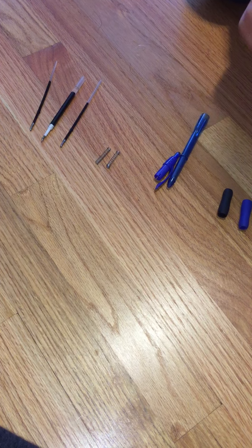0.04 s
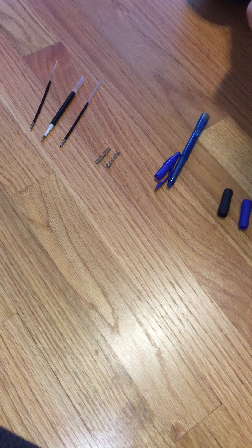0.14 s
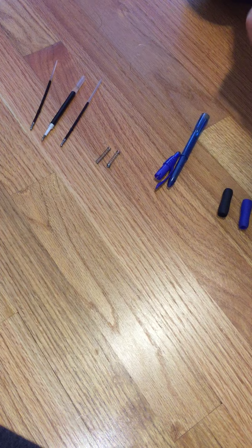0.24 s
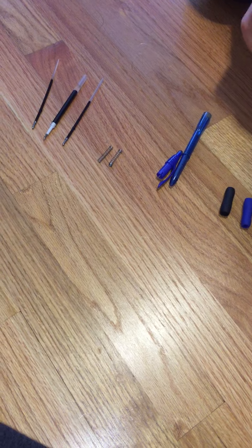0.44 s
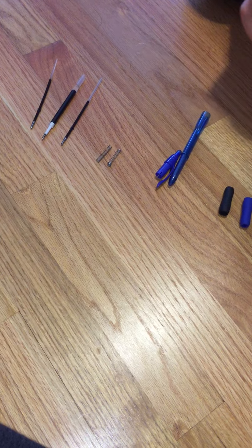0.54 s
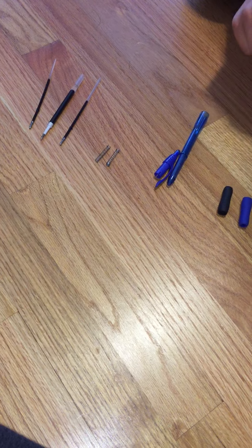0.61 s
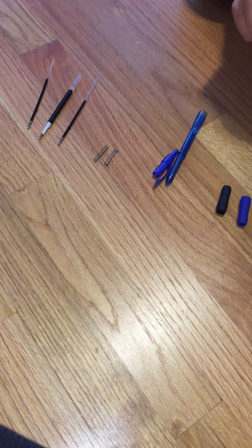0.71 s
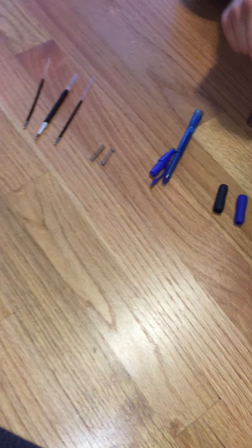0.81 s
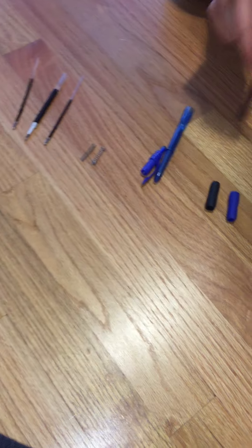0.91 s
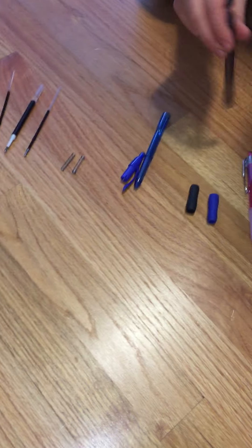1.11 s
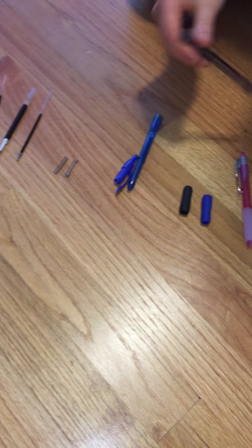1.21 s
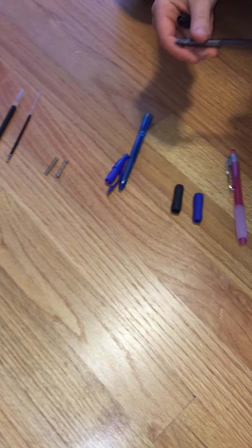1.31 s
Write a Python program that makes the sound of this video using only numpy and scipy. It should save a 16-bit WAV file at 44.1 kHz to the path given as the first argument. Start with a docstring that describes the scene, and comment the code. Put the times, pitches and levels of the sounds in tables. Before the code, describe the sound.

A retractable pen clicks against wood six times, evenly, from about 0.2 to 1.1 seconds. The first click is soft and the last is loudest, each a sharp plastic snap with a light wooden knock and a slight spring rattle. Loose pen parts tick faintly between the clicks and again around 1.3 seconds. The room is small and quiet, with a short echo.

```python
"""A small, quiet room: a retractable pen is clicked six times against wood, a little harder each time.
Each click layers a plastic snap, a shiver of the spring, a short ring of the barrel, a knock of the
wood and a low thud. The latch scrapes before the first click, the hand bumps softly, and loose parts
tick faintly between the clicks and as the pen is lifted. A short reverb and faint room tone sit behind."""
import sys
import numpy as np
from scipy import signal
from scipy.fft import rfft, irfft
from scipy.io import wavfile
from scipy.ndimage import uniform_filter1d

SR = 44100
rng = np.random.default_rng(int(sys.argv[2]) if len(sys.argv) > 2 else 0)


def wav_record(signal):
    """Record a signal, one row per channel, as 16-bit PCM in the file named by sys.argv[1]."""
    frames = np.transpose(np.atleast_2d(signal))
    bounded = np.clip(frames, -1, 1)
    # unit amplitude maps onto the largest positive 16-bit level
    quanta = np.round(bounded * 32767).astype(np.int16)
    wavfile.write(sys.argv[1], SR, quanta)


N = 59535

# bright plastic colour of snap and spring: (frequency [Hz], gain [dB])
SNAP_EQ = [(400, -30), (1500, -10.5), (3200, 3), (4200, 0), (4800, -5.5), (5600, 3), (6500, -4), (8000, -2),
           (9700, -1.5), (11000, -6), (12200, -2), (13700, -3.5), (16000, -16)]
# colour of the ticks and the latch scrape: (frequency [Hz], gain [dB])
TICK_EQ = [(600, -30), (1500, -23), (2400, 6), (3000, 9), (4000, 12.5), (5000, 4.5), (6500, 6), (9300, 6.5),
           (12000, -1), (16000, -8)]
SNAP_RISE_S, KNOCK_RISE_S = 0.00011, 0.00062


def pen_clicks():
    """Six clicks, each stacked from wood, plastic, barrel and thud; returns (direct, reverb send)."""
    # (time [s], knock [dB], contact cut-off [Hz], snap [dB], barrel pitch [Hz], barrel [dB],
    #  upper barrel pitch [Hz], upper barrel [dB], thud [dB], snap reverb send [dB])
    clicks = [(0.2073, -29.5, 2300, -39.5, 1310, -29.5, 2310, -29.5, -50, -10),
              (0.3869, -22, 2380, -27.5, 1184, -22.5, 2680, -28, -53, -1),
              (0.5642, -20.5, 2540, -21, 1440, -23, 2280, -21.5, -46.5, -2),
              (0.7373, -20.5, 2800, -20.5, 1528, -21, 2580, -29, -54, -0.5),
              (0.9089, -18.5, 2880, -17, 1605, -18, 2350, -36, -42.5, 0),
              (1.0727, -17, 3600, -15.5, 1162, -20, 2850, -14.5, -38.5, 2)]
    barrel_send_db = -3.5  # the barrel's ring carries less far than the knock
    t = np.arange(SR // 3) / SR
    direct, send = np.zeros((2, N))
    for start, knock_db, contact_hz, snap_db, *barrel_modes, thud_db, snap_send_db in clicks:
        wood = amp(knock_db) * (wood_knock(t, contact_hz) + board_flex(t))
        snap = plastic_snap(t, t60=0.011, rise=SNAP_RISE_S, eq=SNAP_EQ)
        plastic = amp(snap_db) * (snap + spring_rattle(t))
        barrel = barrel_ring(t, *barrel_modes)
        thud = amp(thud_db) * ring(t, hz=66, t60=0.13, rise=0.017)
        add(direct, start, wood + plastic + barrel + thud)
        add(send, start, wood + amp(snap_send_db) * plastic + amp(barrel_send_db) * barrel)
    return direct, send


def wood_knock(t, contact_hz):
    """The pen strikes the wood: a harder contact reaches higher modes, and low modes arrive later."""
    # modes of the wood: (frequency [Hz], level [dB], t60 [s])
    modes = [(542, -3.5, 0.009), (681.3, -3, 0.025), (830, -17.5, 0.1), (944, -7, .037), (998, -24, 0.054),
             (1050, -22.5, 0.054), (1369, 0, 0.011), (1617.7, 3, 0.015), (1803.5, 13.5, 0.0064),
             (2246, 12.5, 0.0071), (2449, -8.5, 0.041), (2607, 14.5, 0.0055), (3181, 2.5, 0.014),
             (4280, -23, 0.033)]
    knock = np.zeros(len(t))
    for hz, db, t60 in modes:
        contact_rolloff = np.hypot(1, (hz / contact_hz) ** 3.9)
        delay_s = 0.00042 * np.sqrt(1000 / hz)
        knock += amp(db) / contact_rolloff * ring(t - delay_s, hz, t60, KNOCK_RISE_S)
    return low_cut(knock, hz=464.4, order=4)  # thins the bass of the knock


def plastic_snap(t, t60, rise, eq):
    """A dense, very short burst of tiny plastic impacts."""
    burst = even_burst(rng.choice([-1., 1.], len(t)) * envelope(t, t60, rise))
    gate = np.exp(-(t / t60) ** 2)
    return colour(burst * gate, eq)


def barrel_ring(t, low_hz, low_db, upper_hz, upper_db):
    """The barrel rings briefly in two modes, the upper one a hair late."""
    low = ring(t, low_hz, t60=0.018, rise=0.00018)
    upper = ring(t - 0.00029, upper_hz, t60=0.0134, rise=KNOCK_RISE_S)
    return amp(low_db) * low + amp(upper_db) * upper


def board_flex(t):
    """The board bends slowly, putting body under the knock."""
    # bending modes: (frequency [Hz], level [dB], t60 [s])
    modes = [(187, -45, 0.18), (235, -32, 0.097), (265, -26.5, 0.061), (370.4, -49, 0.39)]
    rise_s = 0.0033
    body = sum(amp(db) * ring(t, hz, t60, rise_s) for hz, db, t60 in modes)
    return body + amp(-25) * ring(t, hz=230, t60=0.036, rise=rise_s)


def spring_rattle(t, touches_per_s=500, spread_db=2):
    """The spring shivers after a click: sparse, fading touches inside the barrel."""
    touches = rng.random(len(t)) < touches_per_s / SR
    strength = amp(spread_db * rng.standard_normal(len(t)))
    return amp(-16) * colour(touches * strength * envelope(t, t60=0.16, rise=SNAP_RISE_S), SNAP_EQ)


def loose_parts(rise_s=0.00021):
    """Loose parts touch the barrel, each tick a tiny snap with one ringing note."""
    # (time [s], snap [dB], ring pitch [Hz], ring [dB], t60 [s])
    ticks = [(0.1709, -68, 3550, -47, 0.0027), (0.178, -54, 2800, -38, 0.0082),
             (0.1774, -68, 4200, -42.5, 0.0083), (0.3945, -47.5, 2530, -58, .01),
             (0.4095, -47, 2540, -58, 0.0097), (0.5708, -43, 2500, -59, 0.0049),
             (0.6088, -56, 2500, -61, 0.0045), (0.7515, -36, 2500, -41, 0.0066),
             (0.782, -53, 5960, -48, 0.012), (0.8020, -57, 5800, -50, .015),
             (0.8858, -52, 3600, -45, 0.0059), (0.9212, -41, 2620, -47, 0.012),
             (1.0322, -45.5, 2400, -36, 0.008), (1.0872, -31, 2600, -33, .007),
             (1.285, -69, 2740, -43, 0.0068), (1.3064, -54, 5500, -47, 0.0048),
             (1.315, -62, 5700, -51, 0.011), (1.3305, -52, 5770, -53, 0.0075),
             (1.3370, -48, 3710, -43.5, 0.019), (1.3398, -43, 2430, -30.5, 0.0095)]
    t = np.arange(SR // 20) / SR
    track = np.zeros(N)
    for start, snap_db, ring_hz, ring_db, t60 in ticks:
        snap = amp(snap_db) * plastic_snap(t, t60, rise_s, TICK_EQ)
        add(track, start, snap + amp(ring_db) * ring(t, ring_hz, t60, rise_s))
    return track


def latch_scrape(length_s=0.024):
    """A soft swell of plastic friction from the latch."""
    swell = np.hanning(round(length_s * SR))
    return amp(-67) * colour(swell * rng.standard_normal(len(swell)), TICK_EQ)


def hand_bumps():
    """Soft bumps of the hand, each one damped bass note."""
    # (time [s], level [dB])
    bumps = [(0.457, -56), (0.975, -57), (1.144, -47.5)]
    bump = ring(np.arange(SR // 4) / SR, hz=74.5, t60=0.13, rise=0.0095)
    track = np.zeros(N)
    for start, db in bumps:
        add(track, start, amp(db) * bump)
    return track


def room_reverb(send, gap_s=0.0014, build_s=0.018, early_db=5, early_t60=0.14):
    """Early reflections, a diffuse tail whose bands die at their own speeds, and one low resonance."""
    # colour and decay of the room: (frequency [Hz], gain [dB], t60 [s])
    bands = [(98, -7.5, 0.19), (233, -1, 0.29), (312, -4.5, 0.18), (371, 5, 0.19), (437, -10.5, 0.74),
             (710, -6.5, 0.45), (896, 1, 0.49), (1240, -7, 0.53), (1390, -1.5, 0.43), (2106, -8.5, 0.48),
             (2430, -1.5, 0.45), (2780, -7.5, 0.43), (3800, -2.5, .52), (4900, -5.5, 0.56),
             (5870, -12.5, 0.31), (7400, -3, 0.39), (10200, -13, 0.23), (15200, -9, 0.19)]
    t = np.arange(SR) / SR
    hz, frame_s, spectra = signal.stft(rng.choice([-1., 1.], SR), SR, nperseg=256)
    t60 = curve(bands, hz, column=2)[:, None]
    equal_energy = np.sqrt(2 * np.log(1000) / t60 / SR)
    tail = signal.istft(spectra * decay(frame_s, t60) * equal_energy, SR, nperseg=256)[1][:SR]
    tail *= np.clip((t - gap_s) / build_s, 0, 1)
    tail *= 1 + amp(early_db) * decay(t, early_t60)
    # the negative rise makes a growing ramp: the resonance swells until its decay takes over
    resonance = amp(-49) * ring(t, hz=372, t60=0.08, rise=-0.8)
    response = colour(smooth_tail(tail), bands) + resonance
    return amp(-2) * signal.fftconvolve(send, response)[:N]


def room_tone(rms_db=-70.5):
    """A steady bed of faint rumble and hiss."""
    # noise spectrum: (frequency [Hz], relative level [dB])
    spectrum = [(20, -47), (35, -26), (48, -6), (65, 1), (100, -10.5), (200, -9), (400, -16.5),
                (1000, -20.5), (3000, -23.5), (8000, -27.5), (15000, -33.5)]
    gain = amp(curve(spectrum, np.fft.rfftfreq(N, 1 / SR)))
    noise = irfft(rfft(rng.standard_normal(N)) * gain, N)
    return amp(rms_db) * noise / noise.std()


def amp(db):
    """Decibels to gain."""
    return 10 ** (np.asarray(db) / 20)


def curve(table, hz, column=1):
    """One column of a table, interpolated over log frequency."""
    columns = np.transpose(table)
    return np.interp(np.log(hz + 1), np.log(columns[0]), columns[column])


def add(track, start_s, sound):
    """Lays a sound into a track."""
    part = track[round(start_s * SR):][:len(sound)]
    part += sound[:len(part)]


def decay(t, t60):
    """Falls 60 dB in t60 seconds."""
    return np.exp(-np.log(1000) * t / t60)


def envelope(t, t60, rise):
    """Attack and exponential decay, times in seconds; silent before t = 0."""
    t = np.maximum(t, 0)
    return (1 - np.exp(-t / rise)) * decay(t, t60)


def ring(t, hz, t60, rise):
    """One struck mode."""
    return envelope(t, t60, rise) * np.sin(2 * np.pi * hz * t)


def low_cut(x, hz, order):
    """High-pass filter that thins the bass."""
    return signal.sosfilt(signal.butter(order, hz, "high", fs=SR, output="sos"), x)


def colour(x, eq, size=4096):
    """Minimum-phase EQ: nothing rings ahead of the attack."""
    log_gain = np.log(amp(curve(eq, abs(np.fft.fftfreq(size, 1 / SR)))))
    taps = np.fft.ifft(np.exp(np.conj(signal.hilbert(log_gain)))).real
    return signal.fftconvolve(x, taps)[:len(x)]


def even_burst(x, bins=3):
    """Evens out a burst's spectrum, roughly keeping its energy and timing."""
    spectrum = rfft(x)
    power = uniform_filter1d(abs(spectrum) ** 2, bins) + np.sum(x ** 2) / 20
    return irfft(spectrum / np.sqrt(power), len(x)) * np.linalg.norm(x)


def smooth_tail(x, bins=48):
    """Levels the stray peaks of a tail, so that no single note rings out."""
    spectrum = rfft(x)
    power = abs(spectrum) ** 2
    gain = np.sqrt(uniform_filter1d(power, bins * 10) / uniform_filter1d(power, bins))
    return irfft(spectrum * gain, len(x))


def scene():
    """Mono mix over room tone: clicks and ticks feed the reverb, latch and hand stay dry."""
    pen, send = pen_clicks()
    ticks = loose_parts()
    add(pen, 0.182, latch_scrape())
    return (pen + ticks + hand_bumps() + room_reverb(send + ticks) + room_tone())[None]


def record(dry, top_hz=16600):
    """The microphone's bass roll-off, then a steep cut of the highest treble."""
    thinned = low_cut(dry, hz=44.7, order=3)
    high_cut = signal.firwin(255, top_hz, window=("kaiser", 9), fs=SR)
    return signal.oaconvolve(thinned, high_cut[None], "same")


dry = scene()
out = record(dry)
wav_record(out)
```